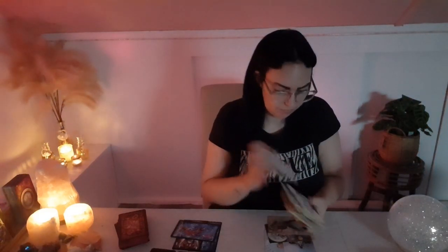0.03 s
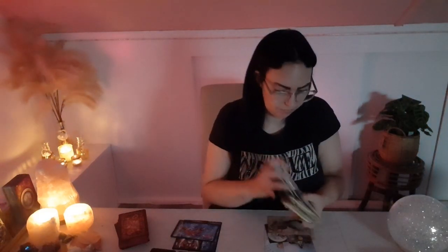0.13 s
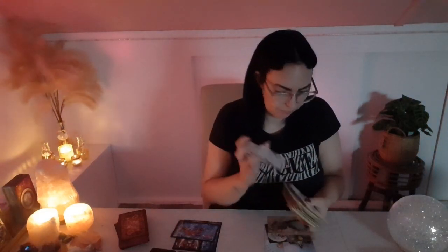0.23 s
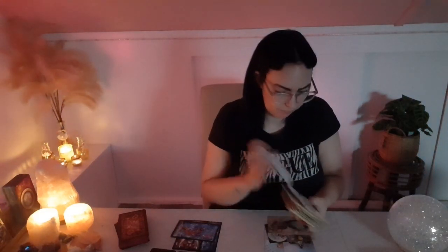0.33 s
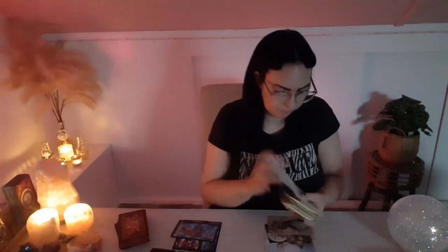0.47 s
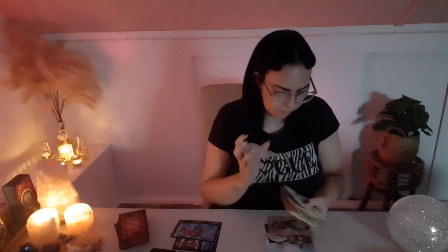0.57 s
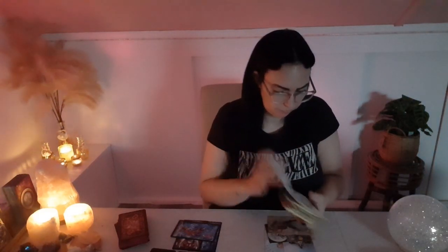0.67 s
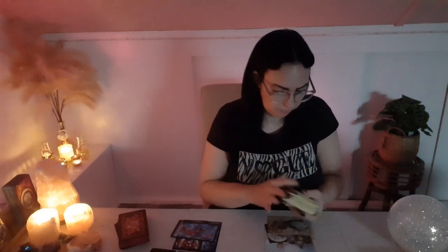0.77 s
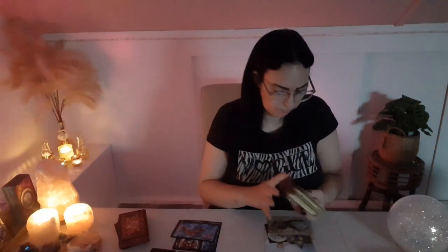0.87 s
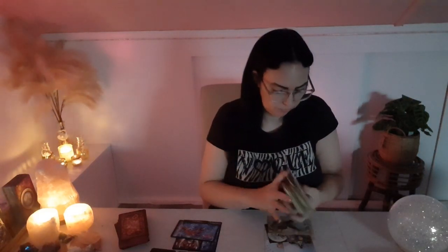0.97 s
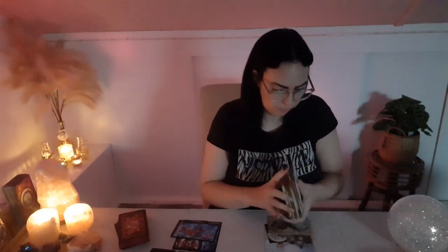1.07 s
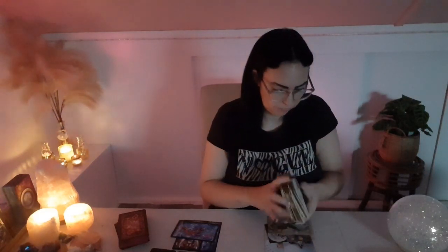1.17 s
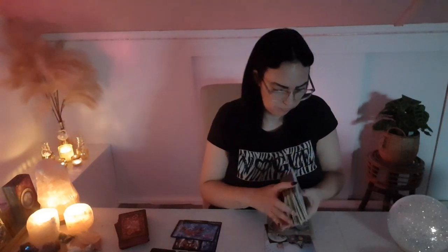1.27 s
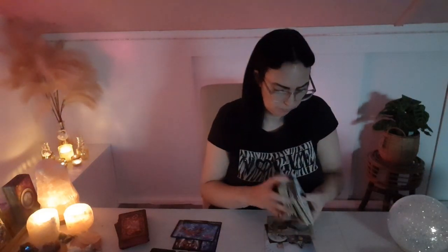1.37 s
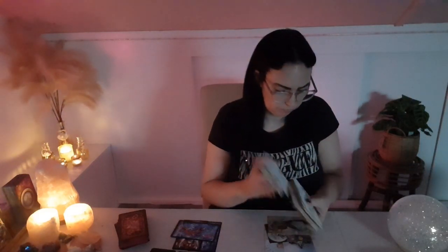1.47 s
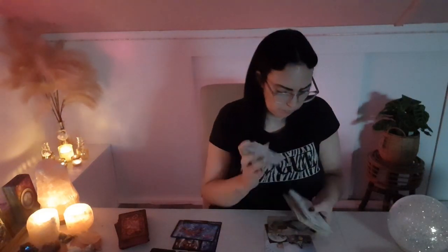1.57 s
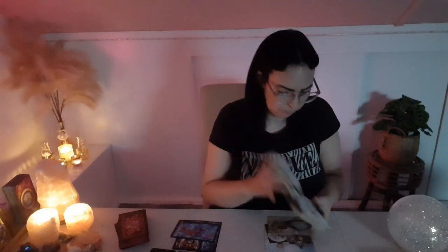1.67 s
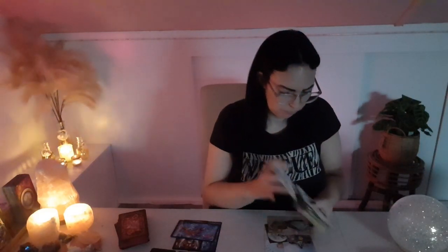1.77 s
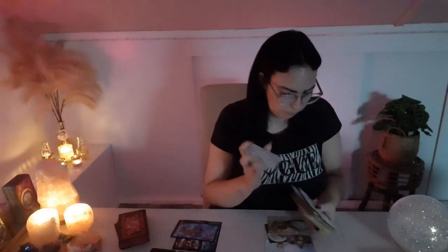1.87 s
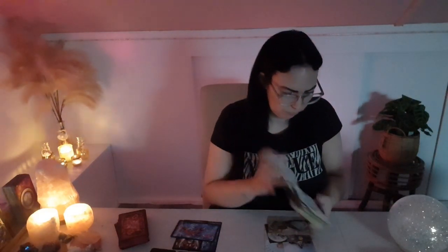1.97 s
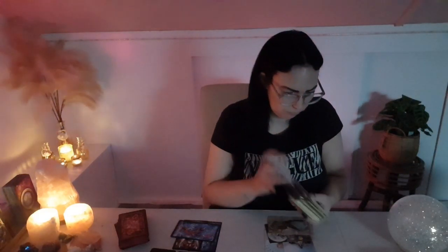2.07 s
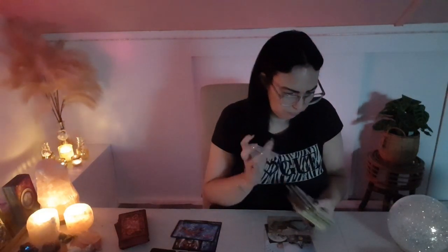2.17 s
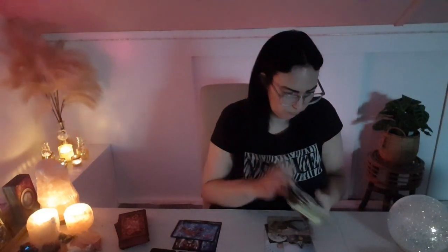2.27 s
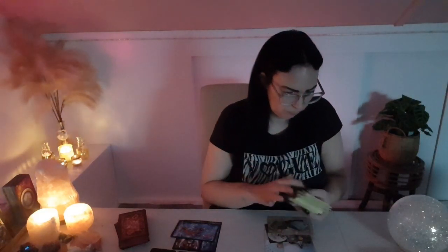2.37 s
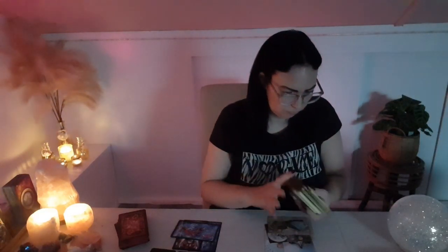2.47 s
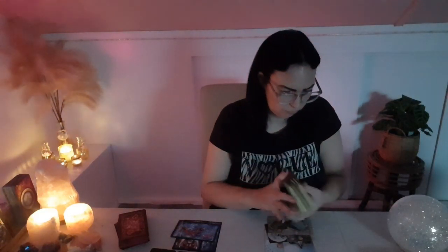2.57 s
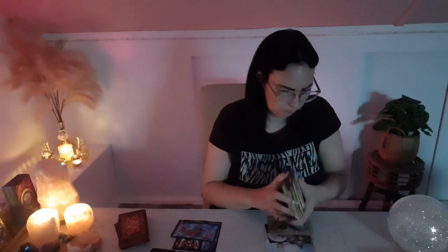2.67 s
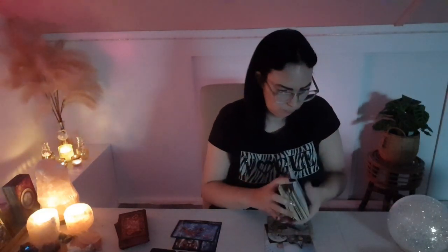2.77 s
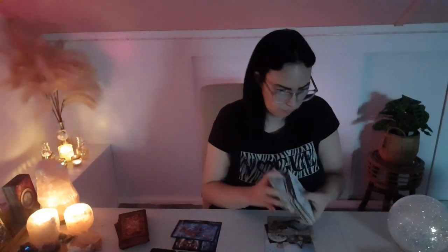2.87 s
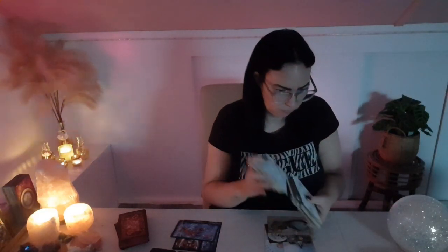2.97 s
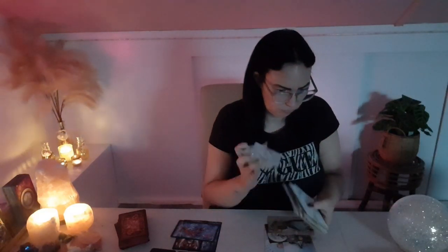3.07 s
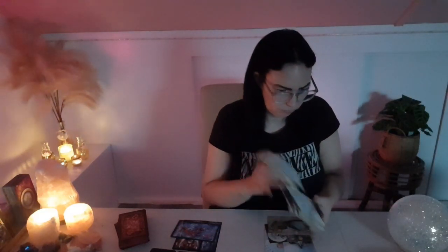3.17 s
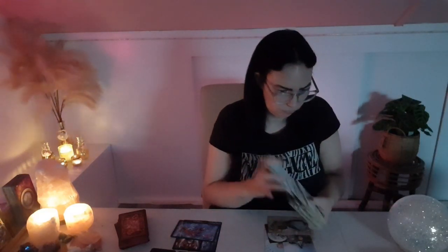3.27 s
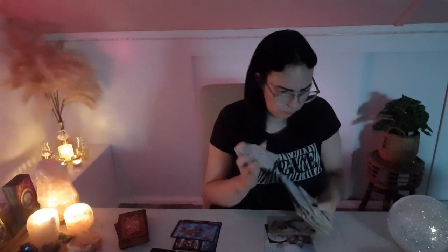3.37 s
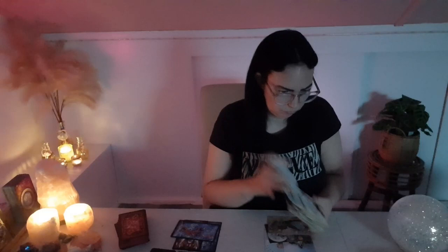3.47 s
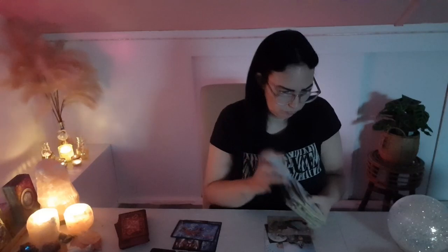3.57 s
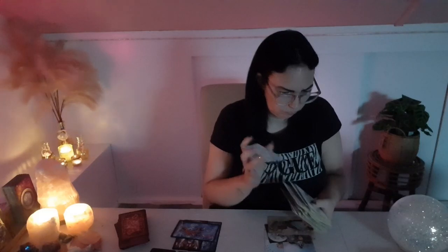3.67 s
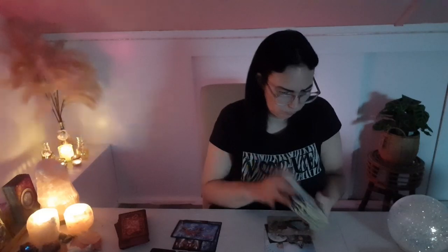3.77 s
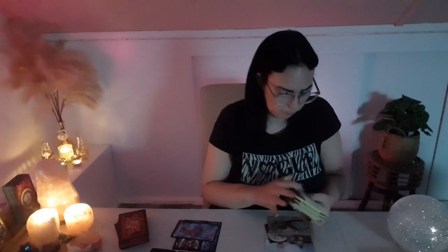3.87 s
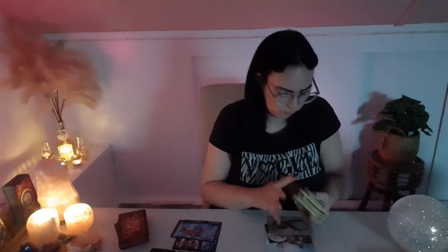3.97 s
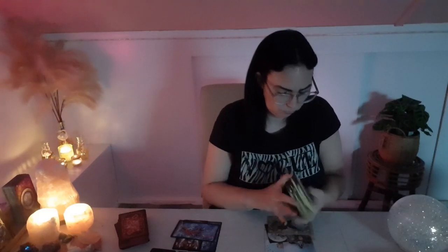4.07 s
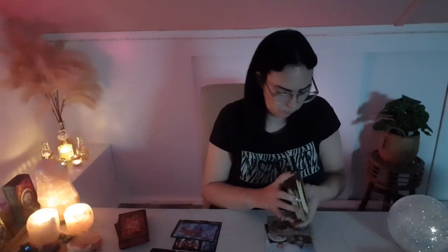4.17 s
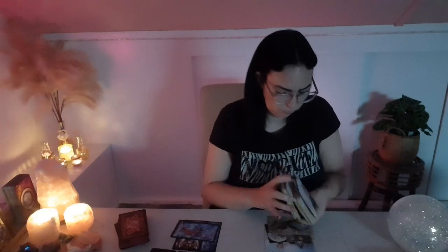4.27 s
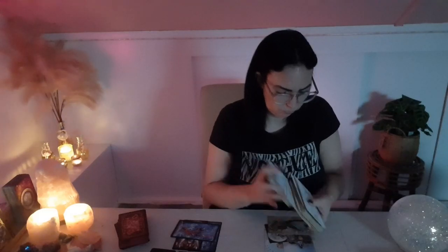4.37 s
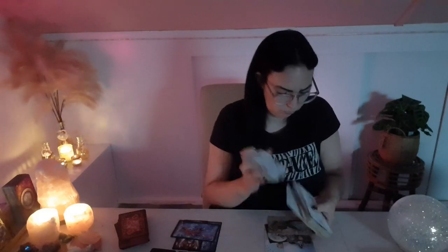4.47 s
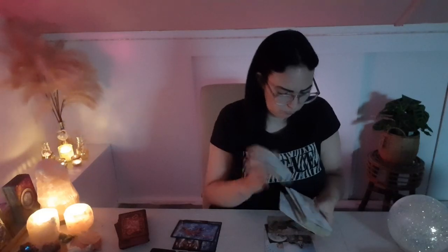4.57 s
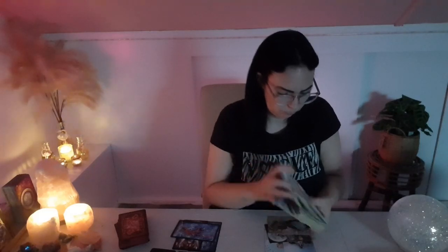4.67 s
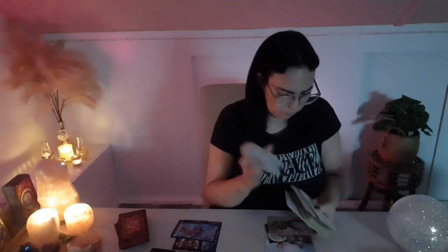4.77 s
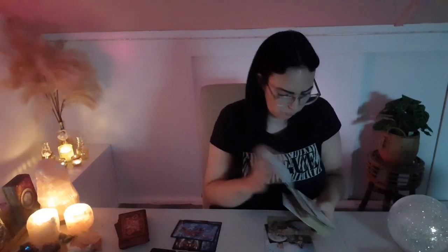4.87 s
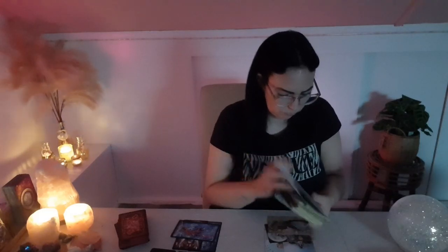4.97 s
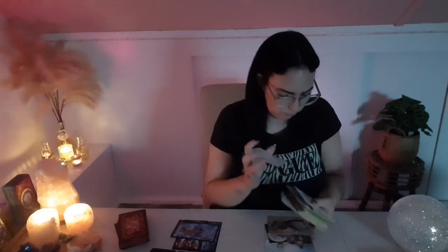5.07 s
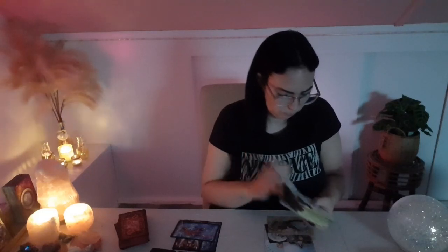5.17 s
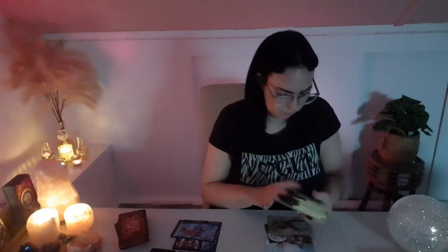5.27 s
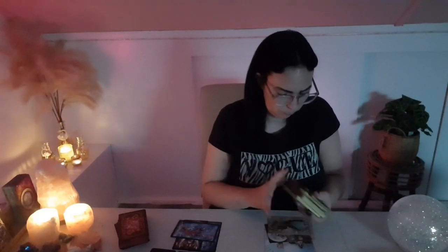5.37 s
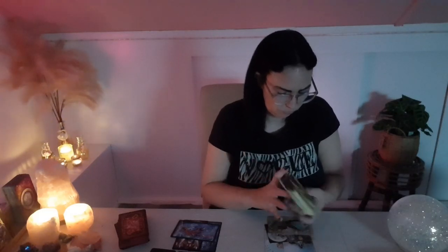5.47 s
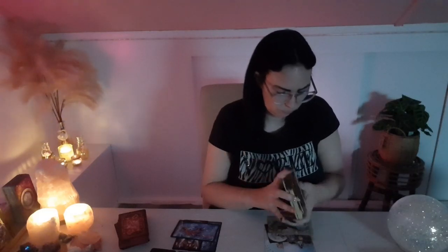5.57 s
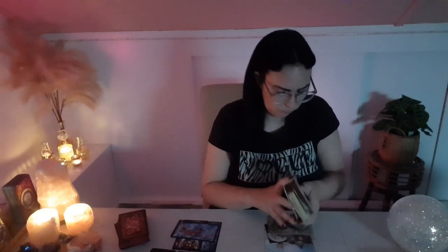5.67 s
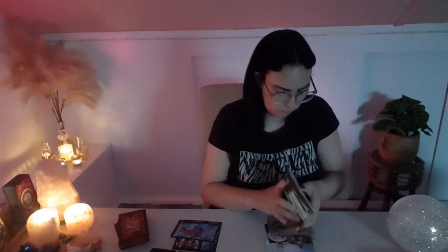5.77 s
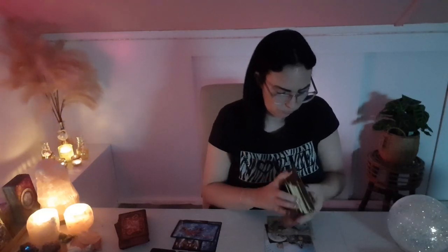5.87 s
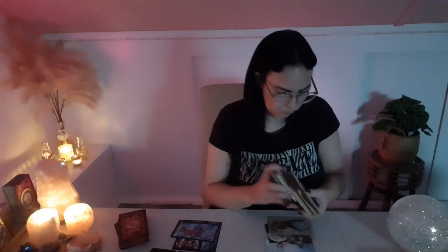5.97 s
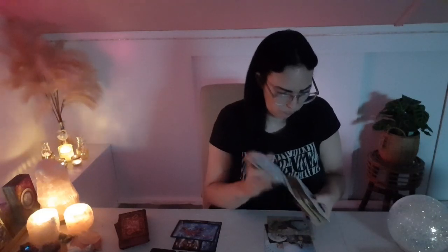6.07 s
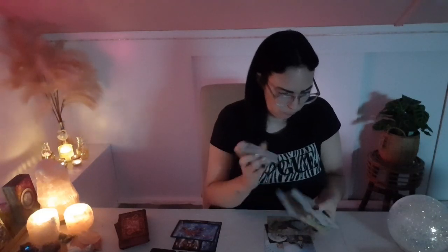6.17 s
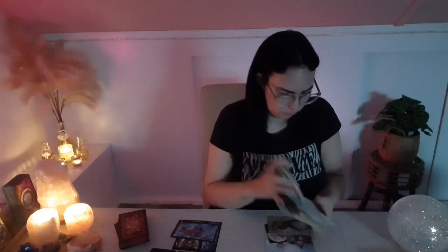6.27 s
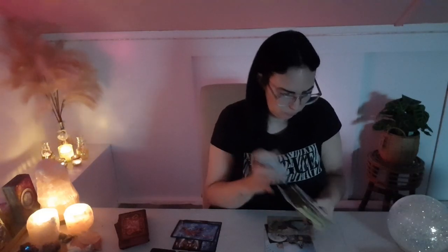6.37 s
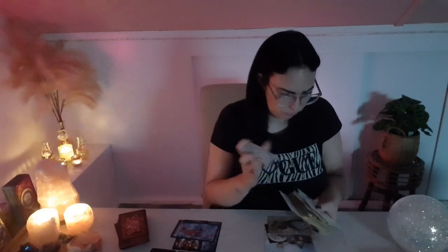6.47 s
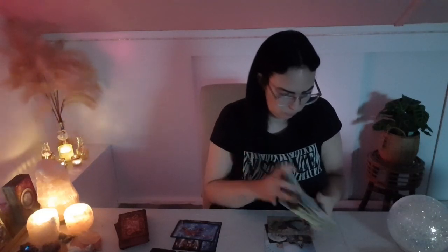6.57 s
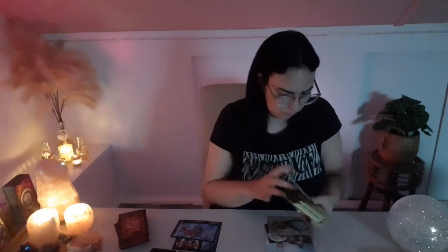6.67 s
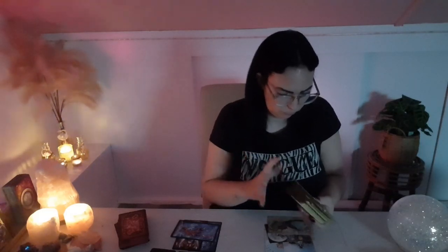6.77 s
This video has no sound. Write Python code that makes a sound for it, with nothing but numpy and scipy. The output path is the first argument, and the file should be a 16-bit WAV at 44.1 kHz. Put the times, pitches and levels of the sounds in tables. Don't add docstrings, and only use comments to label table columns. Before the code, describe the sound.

Close stereo microphones catch a deck of stiff cards being shuffled overhand at a table in a small bare room. A faint rub and tiny puff open it, then light slaps at 0.15 and 0.4 seconds lead to a loud crisp snap at 0.55 and another at 0.74. Soft uneven squaring rubs fill 1.0 to 1.5. Scrapy slaps follow at 1.57 and 1.8, then softer, thumpier ones at 2.1 and 2.37. After a quiet rub, packets land around 3.07, 3.3, 3.6 and 3.85. A small bright slap at 4.2 precedes a busier run at 4.5, 4.75, 5.05 and 5.26. Gentle rubbing returns until 6.1. A slap at 6.16, a very hard cupped slap at 6.38 and a broad scraping one at 6.65 finish. Each hit has a papery slide, edge click and hollow thump, with brief reflections over barely audible hiss and hum.

```python
import sys
import numpy as np
from scipy import signal
from scipy.fft import irfft
from scipy.io import wavfile
from scipy.ndimage import uniform_filter1d

SR = 44100
rng = np.random.default_rng(int(sys.argv[2]) if len(sys.argv) > 2 else 0)


def dump_mix(stems):
    frames = np.atleast_2d(stems).T
    limited = np.clip(frames, -1, 1)
    pcm = np.round(limited * 32767).astype(np.int16)
    wavfile.write(sys.argv[1], SR, pcm)


def to_linear_factor(level_db):
    exponent = np.asarray(level_db, float) / 20
    return 10 ** exponent


N = 300321


def read(points, hz):
    f, value = np.transpose(points)
    return np.interp(np.log(hz + 1), np.log(f + 1), value)


def law(rule, control):
    return rule[0] + rule[1] * control


def add(mix, s, sound):
    part = mix[..., round(s * SR):][..., :sound.shape[-1]]
    part += sound[..., :part.shape[-1]]


def causal(points, size=2048):
    log_gain = np.log(to_linear_factor(read(points, abs(np.fft.fftfreq(size, 1 / SR)))))
    phase = -signal.hilbert(log_gain).imag
    taps = np.fft.ifft(np.exp(log_gain + 1j * phase)).real[:size // 2]
    return taps / np.linalg.norm(taps)


def ring(hz, width):
    t = np.arange(SR // 8) / SR
    taps = np.exp(-np.pi * max(width, 8) * t) * np.sin(2 * np.pi * hz * t)
    return taps / np.linalg.norm(taps)


def steep(hz, width):
    taps = signal.fftconvolve(ring(hz, width), ring(hz, width))[:SR // 20]
    return taps / np.linalg.norm(taps)


def crack(smear_s):
    late = rng.exponential(smear_s * SR, 22)
    late = np.repeat(np.minimum(late, 200), repeats=6)[:129]
    return irfft(np.exp(-2j * np.pi * np.cumsum(late) / 256))


def swell(time_s):
    u = np.arange(SR // 5) / SR / max(time_s, .001)
    return u * np.exp(1 - u)


def friction(size, rough_db=4.8, flutter_db=4.5):
    unevenness = np.minimum(rng.exponential(1, size), 4)
    slips = rng.standard_normal(size) * to_linear_factor(rough_db * unevenness)
    flutter = uniform_filter1d(uniform_filter1d(rng.standard_normal(size), size=60), size=60)
    out = slips * to_linear_factor(flutter_db * flutter / flutter.std())
    return out / out.std()


def pair(shape_db, count):
    # hz, coherence [0-1]
    likeness = [(30, .1), (60, 0.38), (300, 0.64), (700, 0.37), (1500, 0.032), (8000, 0.24)]
    hz = np.fft.rfftfreq(512, 1 / SR)[:, None]
    t = np.arange(count // 128 + 5) * 128 / SR
    a, b, c, d = rng.standard_normal((len(t), len(hz), 4)).T
    same = np.clip(read(likeness, hz), 0, 1)
    left = a + 1j * b
    right = same * left + np.sqrt(1 - same ** 2) * (c + 1j * d)
    z = np.array([left, right]) * to_linear_factor(shape_db(hz, t))
    out = signal.istft(z, nperseg=512, noverlap=384)[1][:, 256:count]
    return out / np.sqrt(np.mean(out ** 2))


def hum():
    # hz, density_db [dB per Hz]
    hiss_spectrum = [(15, -54), (25, -9), (80, -1), (200, -3), (962, -8.5), (1520, -15.5), (2550, -18.5),
                     (7950, -11.5), (8350, -38), (10000, -22), (11600, -12.5), (16000, -11)]
    # time_s, level_db
    drone_levels = [(0.0, -74), (0.4, -76.5), (1.1, -74), (1.44, -84.5), (2.3, -74), (2.7, -82), (3.4, -79),
                    (3.84, -72), (4.6, -81.5), (5.2, -73), (5.6, -80), (6.1, -82), (6.45, -75), (6.8, -71)]
    hiss = pair(lambda hz, t: read(hiss_spectrum, hz) + 0 * t, count=N + 256)
    hiss = signal.sosfilt(signal.butter(3, 34, "high", fs=SR, output="sos"), hiss)
    s, db = np.transpose(drone_levels)
    both, left, right = signal.oaconvolve(rng.standard_normal((3, N)), ring(81.2, 7.8)[None])[:, :N]
    throb = 0.82 * both + 0.31 * np.array([left, right])
    throb = throb * to_linear_factor(np.interp(np.arange(N) / SR, s, db))
    return (to_linear_factor(-73) * hiss + throb) * to_linear_factor([[-2.0], [2.0]])


def rubs():
    # time_s, pressure_db, brightness_db
    strokes = [
        [(0.0, -58, -3.5), (0.044, -84, -22), (0.13, -97, 7)],
        [(0.99, -91, 2), (1.09, -65.5, 4), (1.124, -60, 2.5), (1.21, -94, 14), (1.25, -79, 5.5), (1.38, -93, 6),
         (1.428, -65, 2.5), (1.5, -69.5, 6), (1.552, -67, 14.5)],
        [(2.6, -94, 1), (2.696, -71.5, 7.5), (2.752, -71.5, -1), (2.87, -79.5, 0), (2.946, -76.5, 10),
         (2.962, -65.5, -8), (3.04, -71, 2)],
        [(4.06, -102, -2), (4.076, -76.5, 2), (4.198, -69.5, 5.5), (4.218, -61.5, -1), (4.296, -72.5, -3),
         (4.362, -79, 7.5), (4.505, -73.5, 17.5)],
        [(5.5, -80, -1), (5.566, -74.5, 10), (5.72, -77.5, 1), (5.786, -68, 0), (5.86, -74, 0.5),
         (5.95, -85.5, 7.5), (6.106, -87, 18), (6.125, -70.5, 18)],
    ]
    # level_db at brightness 0, slope [dB per dB]
    flex_law = (-2.3, 0.15)
    # level_db at brightness 0, slope [dB per dB]
    fizz_law = (.3, 1.08)
    # level_db at brightness 0, slope [dB per dB]
    corner_law = (0.41, 0.53)
    t, pressure = np.arange(N) / SR, np.zeros((4, N))
    for rows in strokes:
        s, rub_db, bright = np.transpose(rows)
        bright = np.interp(t, s, bright)
        colour_db = [0 * t] + [law(rule, bright) for rule in (flex_law, fizz_law, corner_law)]
        pressure += to_linear_factor(np.interp(t, s, rub_db, -150, -150) + 1.5 + colour_db)
    return pressure


def pockets():
    # start_s, level_db, pitch_hz, squeeze_s
    thumps = [(0.004, -50, 550, 0.0049), (0.146, -44, 432, .007), (0.169, -44.5, 740, 0.02),
              (0.415, -41, 754, 0.018), (0.509, -33, 360, 0.0058), (0.553, -29, 724, 0.0023),
              (0.734, -38.5, 690, 0.015), (1.569, -43.5, 900, 0.007), (1.784, -42, 745, 0.033),
              (1.864, -39, 547, 0.003), (2.167, -34.5, 392, 0.0038), (2.35, -33.5, 477, 0.0076),
              (2.389, -39, 523, 0.009), (3.069, -44.5, 700, 0.0079), (3.284, -49.5, 950, 0.0095),
              (3.329, -42.5, 705, 0.0068), (3.575, -48, 580, 0.014), (3.625, -40.5, 650, 0.016),
              (3.657, -35.5, 646, 0.0068), (3.874, -43, 630, .007), (4.218, -64.5, 606, 0.033),
              (4.517, -44.5, 845, 0.0074), (4.725, -37.5, 470, 0.0043), (4.804, -36, 656, 0.0037),
              (5.036, -44, 875, 0.0033), (5.083, -47.5, 680, 0.011), (5.255, -33, 484, 0.01),
              (6.15, -38.5, 560, 0.012), (6.378, -37, 516, 0.027), (6.652, -36, 666, 0.021)]
    # start_s, level_db, pitch_hz, squeeze_s
    cupped = [
        (6.379, -37, 708, 0.026),
        (6.652, -46.5, 673, 0.006),
    ]
    out, palm = np.zeros((2, N))
    for rows, loose in (thumps, 1.31), (cupped, 0.27):
        for s, db, hz, squeeze_s in rows:
            push = swell(squeeze_s)
            air = push * rng.standard_normal(len(push))
            add(out, s - .003, to_linear_factor(db - 10.0) * signal.oaconvolve(air, steep(hz, loose * hz)))
            palm_db = db - 27 + 1.5 * np.log2(hz / 500)
            add(palm, s - .003, to_linear_factor(palm_db) * air)
    palm_hz, palm_width_hz = 147, 45
    return out, signal.oaconvolve(palm, steep(palm_hz, palm_width_hz))[:N]


def strikes():
    # start_s, snap_db, knock_hz, brightness_db
    packet_snaps = [(0.143, -14, 2140, -11), (0.5563, -4, 1900, -2), (0.7389, -10, 1560, -7.5),
                    (1.5617, -14, 1560, -26), (1.769, -15, 1810, -7.5), (2.093, -29.5, 1540, -5),
                    (2.347, -24.5, 1760, -10), (3.0703, -22.5, 900, -2.5), (3.2855, -14.5, 990, 2),
                    (3.5688, -23, 2050, 2), (3.829, -28.5, 1520, -4), (4.214, -22, 1840, -4),
                    (4.516, -17.5, 1550, 5), (4.7423, -11.5, 1630, 0.5), (4.99, -32.5, 1500, 0),
                    (5.2615, -17, 1565, -10), (6.1592, -19.5, 1530, 3.5), (6.3789, -2, 790, 2.5),
                    (6.644, -17.5, 2400, 0)]
    # start_s, snap_db, knock_hz, brightness_db
    card_flicks = [(0.164, -23.5, 1950, 7), (0.2408, -23.5, 1640, -15), (0.5145, -18, 2230, -2.5),
                   (0.5483, -23, 1120, -12), (1.5708, -14, 1630, -23), (1.7903, -11, 2070, -20),
                   (1.8214, -14.5, 1660, -13), (2.135, -32, 1710, -14), (2.3831, -27, 860, -2),
                   (3.318, -16, 935, -12), (3.41, -25.5, 1620, -6), (3.649, -13, 1670, -21),
                   (3.8734, -23.5, 2140, -1.5), (4.7964, -17, 1640, -3.5), (5.085, -20, 740, -4.5),
                   (5.04, -22.5, 1430, -10), (4.721, -31, 2000, 6), (5.264, -13, 4400, -11),
                   (5.775, -38, 4700, 4.5), (0.03, -35, 1560, -15), (0.551, -41, 3600, -12),
                   (0.589, -29, 1990, -5), (3.658, -42, 1450, -9), (6.3815, -7, 656, -22),
                   (6.674, -13.5, 2480, -10), (6.727, -16, 1490, -8)]
    # level_db at brightness 0, slope [dB per dB]
    fizz_law = (-0.047, 0.84)
    # level_db at brightness 0, slope [dB per dB]
    corner_law = (0.83, 1)
    snaps, knocks = np.zeros((4, N)), np.zeros(N)
    for rows, knock_db in (packet_snaps, -6), (card_flicks, -2.5):
        for s, db, hz, bright in rows:
            colour_db = np.array([0, -150, law(fizz_law, bright), law(corner_law, bright)])
            add(snaps, s, crack(.0004) * to_linear_factor(db - 2.0 + colour_db[:, None]))
            add(knocks, s, to_linear_factor(db + knock_db) * steep(hz, .5 * hz))
    return snaps, knocks


def slides():
    # start_s, level_db, swell_s, brightness_db
    scrapes = [(0.134, -46.5, 0.0085, 1), (0.414, -46, 0.013, -2.5), (0.561, -54.5, 0.024, 0),
               (0.732, -42, 0.0023, -8), (1.56, -37.5, 0.0026, -5.5), (1.779, -34.5, 0.0076, 0),
               (2.084, -52.5, 0.015, 2.5), (2.345, -51.5, .006, 3.5), (2.72, -67.5, 0.012, 14),
               (2.945, -66.5, 0.012, 16), (3.035, -54, 0.0054, 2.5), (3.282, -37.5, .008, -12),
               (3.567, -51, 0.013, 6), (3.602, -44.5, 0.013, -2.5), (3.828, -53.5, 0.0078, -1),
               (3.869, -51, .01, 0.5), (4.075, -66.5, 0.0046, -13), (4.209, -46, 0.003, -2),
               (4.709, -47, 0.0097, 3), (4.735, -46, 0.0066, -4), (4.987, -54, 0.0099, -1),
               (5.024, -51, 0.01, 8.5), (5.244, -49, 0.0061, -5), (5.255, -41, 0.0044, -5),
               (6.156, -51, 0.0014, -46), (6.639, -36, 0.0084, -3.5), (6.66, -43.5, 0.024, -3.5)]
    # start_s, level_db, swell_s, brightness_db
    settling = [(0.179, -50.5, 0.014, 2), (0.464, -51.5, 0.016, 0), (0.762, -51, 0.013, -4),
                (1.811, -43.5, 0.014, 2.5), (1.845, -46.5, 0.0092, -10), (2.115, -55, 0.017, 7.5),
                (2.376, -48.5, 0.009, -6.5), (2.41, -70, 0.012, 12), (3.069, -46, 0.0017, -11),
                (3.311, -46, 0.017, -0.5), (3.37, -51.5, 0.014, -10), (3.649, -43.5, 0.0028, 2.5),
                (4.513, -47, 0.0037, 4), (4.768, -48, 0.011, 0), (5.06, -53, 0.016, -4.5),
                (5.272, -52.5, 0.024, -4), (6.126, -57.5, 0.014, 5.5), (6.37, -39.5, .005, -8),
                (6.387, -41.5, 0.032, -17)]
    # level_db at brightness 0, slope [dB per dB]
    fizz_law = (1, 0.95)
    # level_db at brightness 0, slope [dB per dB]
    corner_law = (-0.86, 0.6)
    pressure = np.zeros((4, N))
    for rows, flex_db in (scrapes, 0.5), (settling, 5):
        for s, db, swell_s, bright in rows:
            colour_db = np.array([0, flex_db, law(fizz_law, bright), law(corner_law, bright)])
            add(pressure, s, swell(swell_s) * to_linear_factor(db - 2.0 + colour_db[:, None]))
    return pressure


def cards(spread=1.0):
    # hz, level_db
    edge = [(100, -43), (400, -30), (1100, -5), (2500, 1.5), (4200, 7.5), (5300, 4), (7000, -33),
            (9000, -50.5)]
    # pitch_hz, width_hz, level_db
    flex = [
        (1500, 380, -3.5),
        (1555, 160, -9),
        (2080, 700, -.5),
    ]
    # hz, level_db
    fizz = [(2000, -73), (6000, -40), (8800, -12.5), (11000, 0.5), (13700, 1.5), (16000, -2)]
    # hz, level_db
    corners = [(1500, -49), (4000, -29), (5500, 1.5), (7600, 4), (8300, -5), (8800, -16), (11000, -31)]
    pressure = rubs() + slides()
    snaps, knocks = strikes()
    slips = friction(N) + spread * np.array([friction(N), friction(N)])
    slips = slips / np.sqrt(1 + spread ** 2)
    drive = pressure[:, None] * slips + snaps[:, None]
    bend = to_linear_factor(-2.0) * sum(to_linear_factor(db) * steep(hz, width) for hz, width, db in flex)
    bodies = causal(edge), bend, causal(fizz), causal(corners)
    return knocks + sum(signal.oaconvolve(d, body[None])[:, :N] for d, body in zip(drive, bodies))


def room(x, places=5):
    # delay_s, left_db, right_db
    echoes = [
        (.0033, -1, -1),
        (.0074, -11, -8),
        (.0240, -10, -14),
    ]
    # hz, t60_s
    walls = [(150, 0.4), (500, 0.38), (1500, 0.37), (4000, 0.38), (12000, 0.27)]
    out = x * to_linear_factor([[-5.5], [-2.5]])
    turn = np.arange(N) / SR * 3.1
    for k in range(places):
        share = np.sqrt(np.clip(1 - abs((turn - k + 2) % places - 2), 0, 1))
        tail = pair(lambda hz, t: -60 * t / read(walls, hz), count=SR * 3 // 4)
        size = tail.shape[1]
        onset = np.minimum(np.arange(size) / (0.012 * SR), 1)
        tail = tail / np.sqrt(size) * onset * to_linear_factor([[-2.5], [.5]])
        for s, left_db, right_db in echoes:
            scatter = np.array([crack(.00025), crack(.00025)])
            add(tail, s, scatter * to_linear_factor([[left_db - 5.5], [right_db - 2.5]]))
        out = out + signal.oaconvolve(share * x, tail, axes=1)[:, :N]
    return out


def scene():
    small = signal.butter(4, 285, "high", fs=SR, output="sos")
    puffs, palm = pockets()
    deck = signal.sosfilt(small, cards() + puffs)
    return room(deck + 0.3 * palm) + palm * to_linear_factor([[-4.], [0.]]) + hum()


def top_cut(x):
    return signal.sosfilt(signal.butter(12, 16970, fs=SR, output="sos"), x)


def record(dry):
    # hz, level_db
    housing = [(300, 0.5), (500, -1), (690, 2.5), (1100, -2.5), (1550, 0), (3000, -0.5), (4300, -0.5),
               (8050, 0)]
    left = signal.lfilter([.8, .18], [1], dry[0])
    spaced = np.array([left, np.roll(dry[1], shift=4)])
    spaced = signal.oaconvolve(spaced, causal(housing)[None])[:, :N]
    top_hz = 15950
    limited = signal.oaconvolve(spaced, signal.firwin(511, top_hz, fs=SR)[None], "same")
    return top_cut(limited)


dry = scene()
out = record(dry)
dump_mix(out)
```